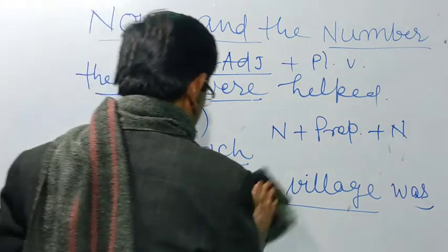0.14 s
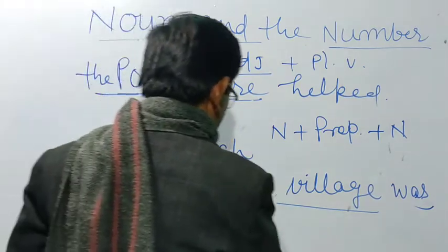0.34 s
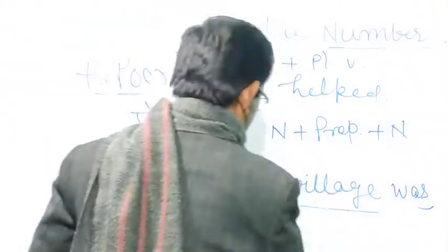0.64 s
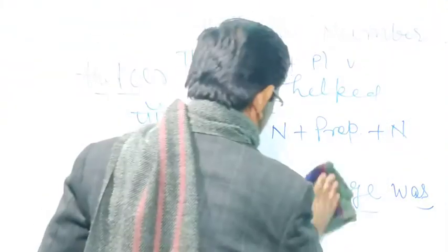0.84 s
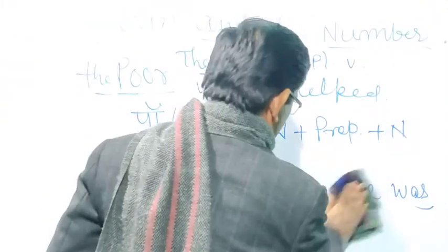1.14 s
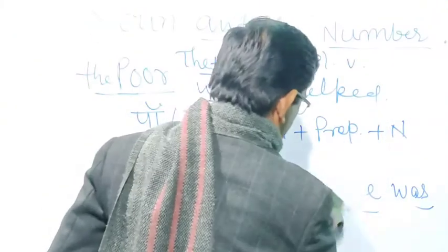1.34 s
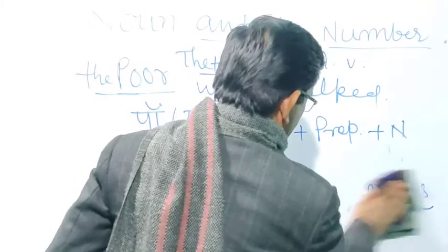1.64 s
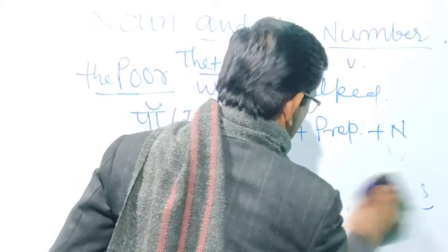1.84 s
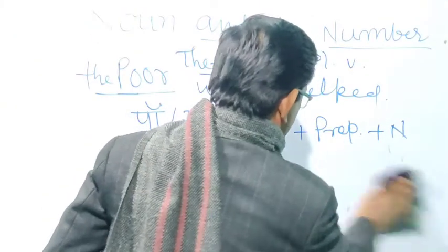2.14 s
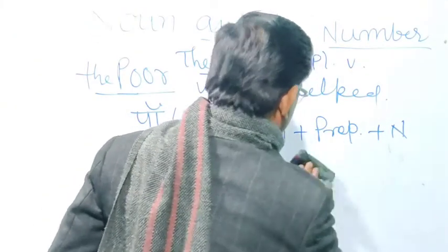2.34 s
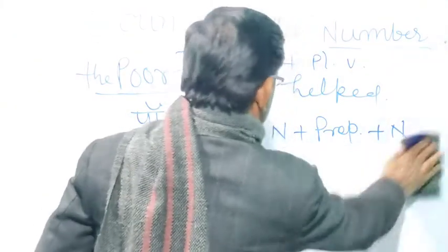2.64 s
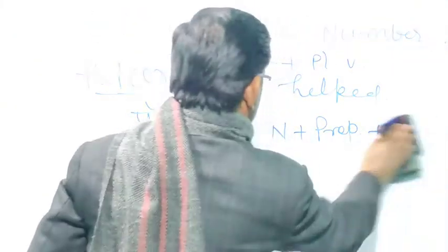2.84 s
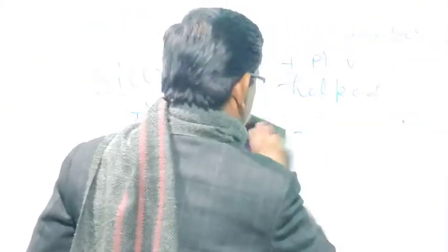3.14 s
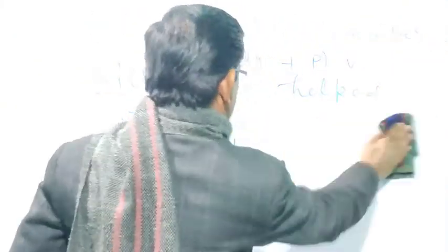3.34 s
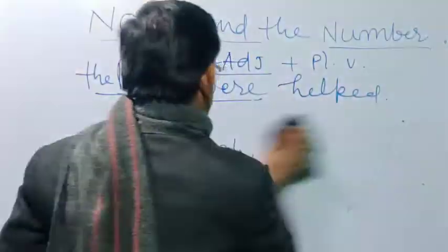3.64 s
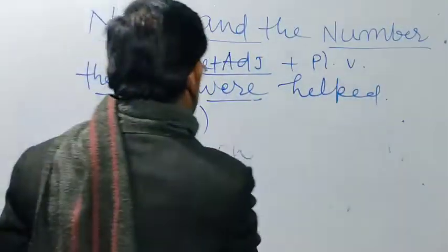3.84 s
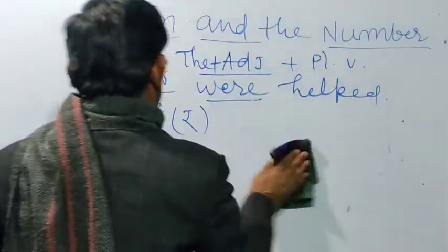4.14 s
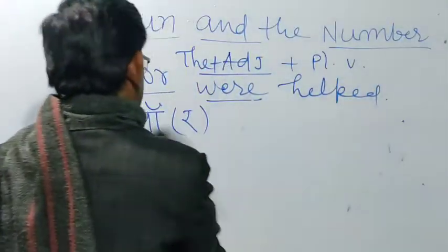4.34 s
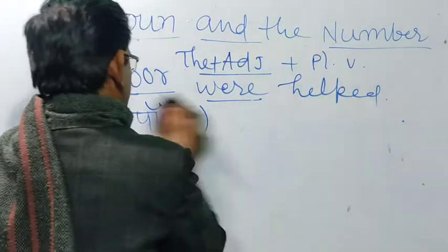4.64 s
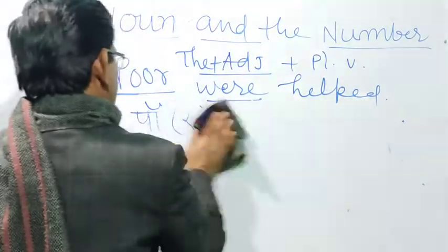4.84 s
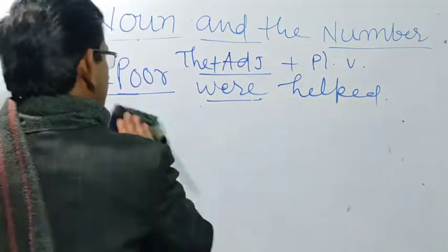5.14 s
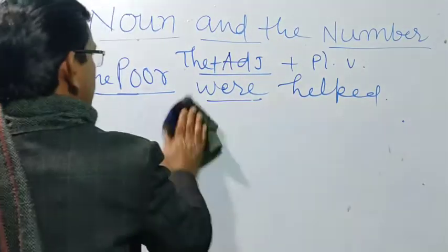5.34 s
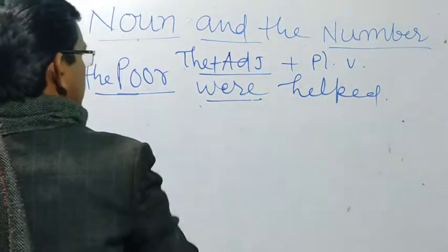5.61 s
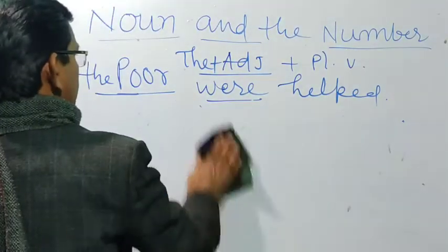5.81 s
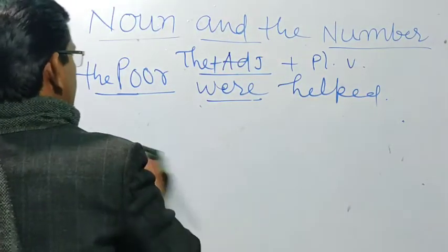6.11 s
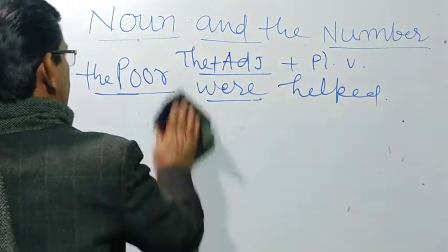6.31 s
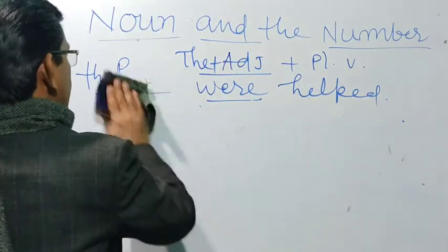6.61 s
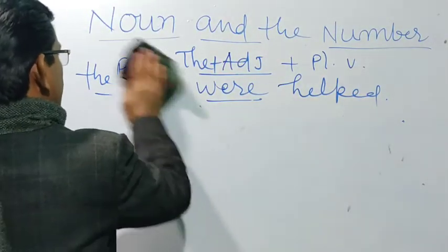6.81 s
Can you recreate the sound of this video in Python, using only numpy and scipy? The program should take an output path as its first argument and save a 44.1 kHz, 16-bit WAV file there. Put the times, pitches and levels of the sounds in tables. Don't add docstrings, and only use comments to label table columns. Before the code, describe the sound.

A hand rubs a folded cloth over a thin wall board, already moving at 0 s and continuing to about 7 s. Strokes last roughly 0.15 to 0.5 s, each swelling in soft hiss and dipping at the turn. Beneath is a hollow, grainy rubbing rumble, with low boom and loose-frame rattle. Light knuckle taps fall at 0.15, 0.3 and 0.6 s. The frame groans at 1.2 s, fading within half a second; a very thin, faint squeak comes near 1.75. Gritty ticks stand out at 2.25, 3.1 and 4.7 s. Dull thuds cluster from 3.3 to 3.9, strongest near 3.4, with firmer rubbing around 3.8; heavy knocks follow at 4.45 and 6.13. From 4.95 to 5.7 a faint far motor tone wavers and rises. Close small microphone, short dull room tail, quiet steady air hiss.

```python
import sys
import numpy as np
from scipy import signal
from scipy.fft import rfft, irfft
from scipy.io import wavfile
from scipy.ndimage import uniform_filter1d

SR = 44100
rng = np.random.default_rng(int(sys.argv[2]) if len(sys.argv) > 2 else 0)


def gain_from_db(level_db):
    decades = np.asarray(level_db, float) / 20
    return 10 ** decades


def digitize_waveform(pressure):
    field = np.atleast_2d(pressure).T
    bounded = np.clip(field, -1, 1)
    quanta = np.round(bounded * 32767).astype(np.int16)
    wavfile.write(sys.argv[1], SR, quanta)


N = 307377


def level(x, db=0.):
    return x * gain_from_db(db) / np.sqrt(np.mean(x ** 2))


def colour(x, points):
    hz, db = np.transpose(points)
    bins = np.maximum(np.arange(N // 2 + 1) * SR / N, 1e-3)
    gain = gain_from_db(np.interp(np.log(bins), np.log(hz), db))
    return irfft(rfft(x) * gain, N)


def ring(x, hz, width):
    return signal.lfilter(*signal.iirpeak(hz, hz / width, SR), x)


def rings(x, table):
    total = np.zeros(N)
    for k, (hz, width, db) in enumerate(table):
        mode = ring(ring(x, hz, width), hz, 2 * width)
        total += (-1) ** k * gain_from_db(db) * mode
    return level(total)


def walk(rate):
    k = int(SR / rate)
    held = np.repeat(rng.standard_normal(N // k + 1), k)
    return level(uniform_filter1d(uniform_filter1d(held, k), k)[:N])


def slips(rate, spread_db):
    happens = rng.random(N) < rate / SR
    return happens * rng.standard_normal(N) * gain_from_db(spread_db * rng.exponential(size=N))


def curves(table):
    s, *columns = np.transpose(table)
    return [np.interp(np.arange(N) / SR, s, c) for c in columns]


def steady(x, seconds, share):
    power = uniform_filter1d(x ** 2, int(seconds * SR))
    return level(x / power ** (share / 2))


def during(start, end):
    t = np.arange(N) / SR
    return uniform_filter1d(1. * ((t > start) & (t < end)), int(0.019 * SR))


def add(out, s, sound):
    i = int(s * SR)
    out[i:i + len(sound)] += sound[:N - i]


def strike(modes, chance, rise_s, stretch=1.0, seconds=.3):
    t = np.arange(int(seconds * SR)) / SR
    y = np.zeros(len(t))
    for (hz, db, t60), c in zip(modes, chance):
        decay = 1000. ** (-t / (t60 * stretch))
        y += gain_from_db(db + 1.5 * c) * np.sin(2 * np.pi * hz * (1 + 0.03 * c) * t) * decay
    y = y * (1 - np.exp(-(t / rise_s) ** 2))
    return -y / np.abs(y).max()


def jolts(events, over_db, seconds):
    out = np.zeros(N)
    for s, db, *_ in events:
        add(out, s, gain_from_db(db + over_db) * np.exp(-np.arange(SR // 3) / SR / seconds))
    return out


# (frequency [Hz], density [dB per Hz])
AIR = [(29, -40), (50, -26), (81, -26), (191, -28.5), (452, -20.5), (766, -22.5), (4720, -29.5),
       (10200, -35.5), (13500, -56), (15200, -30.5)]


def air():
    return level(colour(rng.standard_normal(N), AIR), -64.0)


# (turn [s], hiss at the turn [dB],
# fastest at share of the stroke [0-1], hiss there [dB], fine-fibre sheen over hiss [dB])
STROKES = [(-0.02, -63.5, 1, -62, -0.5), (0.294, -65, 0.1, -63, 2), (0.439, -66.5, 0.2, -62.5, 0.5),
           (0.738, -64, 0.7, -60, 0.5), (0.963, -65, 0.1, -61, 1), (1.098, -63.5, 0.8, -60.5, 3),
           (1.292, -64, .45, -61.5, 1), (1.422, -63, 0.85, -58, 2), (1.676, -64, 0.7, -61, 1),
           (1.866, -64.5, 0.82, -56.5, 1), (2.105, -64.5, 0.6, -60.5, 1.5), (2.434, -67, 0.83, -58.5, -1),
           (2.829, -64, 0.85, -58.5, 0), (3.2, -66, 0.75, -57.5, 0.5), (3.496, -69, 0.82, -59.5, 0),
           (3.936, -67, 0.47, -59.5, 0), (4.225, -66, 1, -60.5, -0.5), (4.575, -64, 0.49, -57, -2),
           (4.894, -69, .7, -60.5, -0.5), (5.198, -64, 0.44, -62, 1), (5.453, -68, 0.66, -58.5, -1),
           (5.927, -65.5, 0.76, -61, 1.5), (6.354, -65.5, 0.9, -60, 0), (6.72, -61.5, 1, -60, 2)]
LAST_TURN_S = 7.05
ARCH_ROUND = 0.81
SHEEN_STALL_PER_DB, MOVING_DB = 0.3, -55
STALL_S, SHEEN_FOLLOW = 0.03, 0.6


def strokes():
    turn_s, turn_db, fastest, top_db, sheen_db = np.transpose(STROKES)
    t, ends = np.arange(N) / SR, np.append(turn_s, LAST_TURN_S)
    k = np.clip(np.searchsorted(turn_s, t) - 1, 0, None)
    done = (t - ends[k]) / np.diff(ends)[k]
    peak = np.clip(fastest, .1, .9)[k]
    rise_or_fall = np.minimum(done / peak, (1 - done) / (1 - peak))
    arch = np.sin(np.pi / 2 * np.clip(rise_or_fall, 0, 1))
    slow_db = np.interp(t, turn_s, turn_db)
    hiss_db = slow_db + (top_db[k] - slow_db) * arch ** ARCH_ROUND
    stall_db = slow_db + SHEEN_STALL_PER_DB * (slow_db - MOVING_DB)
    to_turn_s = np.minimum(t - ends[k], ends[k + 1] - t)
    moving = 1 - np.exp(-(to_turn_s / STALL_S) ** 2)
    full_db = top_db[k] + sheen_db[k] - SHEEN_FOLLOW * (top_db[k] - slow_db) * (1 - arch)
    return hiss_db, stall_db + (full_db - stall_db) * moving


# (frequency [Hz], density [dB per Hz])
HISS = [(880, -8.5), (1500, -3), (4900, -10.5), (8940, -9.5), (13300, -15.5), (15200, -17.5)]


def fibre_hiss():
    hiss_db, sheen_db = strokes()
    fibres = level(colour(rng.standard_normal(N) + 0.1 * level(slips(1500., 2.4)), HISS))
    sheen = signal.sosfiltfilt(signal.butter(2, 10500, "high", fs=SR, output="sos"), fibres)
    hiss = gain_from_db(hiss_db + 5.0) * (fibres - sheen) + gain_from_db(sheen_db + 11.5) * sheen
    return gain_from_db(0.76 * walk(25.)) * hiss


# (hardest [s], length [s], slip rumble [dB], shake of the sheet [dB])
LEANS = [(0.166, 0.31, -58.5, -50.5), (0.376, 0.13, -59.5, -65), (0.576, 0.29, -58.5, -55.5),
         (0.86, 0.19, -57, -59), (1.01, 0.083, -58, -60), (1.29, 0.29, -53.5, -55.5),
         (1.533, 0.3, -55.5, -50), (1.793, 0.18, -57, -56), (2, 0.21, -57, -50.5),
         (2.3, 0.32, -56.5, -54.5), (2.72, 0.34, -59.5, -54.5), (2.905, 0.16, -69, -60),
         (3.084, 0.18, -50, -55), (3.33, 0.32, -54, -56.5), (3.686, 0.13, -56, -57),
         (3.779, 0.25, -47.5, -54), (4.058, 0.3, -54, -55), (4.352, .17, -50.5, -57.5),
         (4.44, 0.26, -52, -53.5), (4.728, 0.25, -52, -57.5), (5.034, 0.28, -55.5, -61),
         (5.15, 0.14, -74, -57), (5.3, 0.19, -61, -62), (5.552, 0.17, -52, -64), (5.688, 0.19, -54, -53.5),
         (5.853, 0.24, -55, -55.5), (6.058, 0.23, -53.5, -57), (6.3, 0.27, -56.5, -59),
         (6.577, 0.45, -65.5, -59), (6.964, 0.23, -55, -54.5)]
BELL_POWER = 1.75


def leans(width):
    t = np.arange(0, N, 64) / SR
    s, length, *db = np.transpose(LEANS)
    bells = np.exp(-np.abs((t - s[:, None]) / (width * length[:, None])) ** BELL_POWER)
    return [np.interp(np.arange(N) / SR, t, np.sqrt(gain_from_db(d) ** 2 @ bells)) for d in db]


# (frequency [Hz], width [Hz], level [dB])
PANEL_RINGS = [(543, 146, 0.5), (755.5, 144, -2.5), (1000, 300, 2.5), (1370, 370, -3), (2000, 1660, -10.5)]
# (time [s], place [-1 edge to 1 middle])
PAD = [(0, .5), (.5, 0.9), (.9, .6), (1.3, .6), (1.75, -0.16), (2.0, 0.32), (2.4, 0.98), (3.1, 0.94),
       (3.4, .3), (3.75, 0.21), (4.05, -.2), (4.38, -0.21), (4.72, -.3), (5.1, -0.38), (5.55, -.5),
       (5.85, -0.29), (6.2, -0.85), (6.97, -0.34)]
LOWEST_DB_PER_PLACE, UPPER_DB_PER_PLACE = 3, 1.1
RUMBLE_REST_DB, REST_PER_DB = -61.5, .5
BRIGHT_PER_DB, FIRM_DB = 0.23, -58.5
JOLT_DB, JOLT_S = -15.5, 0.0079


def pad_rumble():
    (hiss_db, _), (place,) = strokes(), curves(PAD)
    pull = rng.standard_normal(N) + 0.9 * level(slips(900., 0.83))
    lowest = rings(pull, PANEL_RINGS[:1])
    middle = rings(pull, PANEL_RINGS[1:2])
    upper = rings(pull, PANEL_RINGS[2:])
    rest = gain_from_db(RUMBLE_REST_DB + REST_PER_DB * (hiss_db + 62))
    lean = np.hypot(leans(0.26)[0], rest)
    upper = upper * (lean / gain_from_db(FIRM_DB)) ** BRIGHT_PER_DB
    drag = middle - gain_from_db(LOWEST_DB_PER_PLACE * place) * lowest
    drag = drag - gain_from_db(UPPER_DB_PER_PLACE * place + 2.5) * upper
    rumble = lean + jolts(TAPS, JOLT_DB, JOLT_S)
    return rumble * gain_from_db(-5.5 + 0.48 * walk(30.)) * drag


# (frequency [Hz], density [dB per Hz])
FLEX = [(1.8, -43), (3.0, 17.5), (18, 7), (29, -0.5), (60, -43.5), (78, -60), (130, -120)]
# (time [s], slow flexing [dB])
PUSH = [(0.0, -20), (0.06, -34), (1.4, -32.5), (2.17, -39.5), (2.41, -27.5), (2.7, -45.5), (3.43, -28),
        (3.47, -35), (3.8, -30), (4.6, -41), (5.03, -30), (5.47, -46.5), (5.67, -34.5), (6.64, -39.5),
        (6.74, -33), (6.97, -32.5)]
# (frequency [Hz], width [Hz], level [dB])
RATTLE_RINGS = [(97.6, 56, 2), (133, 45.4, 1.5), (181.4, 52.4, 2.5), (266.3, 82, -3), (345, 130, -3.5)]
RATTLE_REST_DB, BOOM_REST_DB, BOOM_OVER_SHAKE_DB = -62.5, -63, 2.5
RATTLE_AFTER_DB, RATTLE_AFTER_S = -15, 0.025
SETTLE_S = .06


def panel():
    (flex_db,), shake = curves(PUSH), leans(0.45)[1]
    flex = steady(colour(rng.standard_normal(N), FLEX), 0.57, 0.56)
    flex = flex * signal.windows.tukey(N, 2 * SETTLE_S * SR / N)
    boom = steady(rings(rng.standard_normal(N), [(53.1, 37.0, 0)]), 0.16, 0.058)
    shaking = rng.standard_normal(N) + 0.48 * level(slips(300., 2.3))
    rattle = steady(rings(shaking, RATTLE_RINGS), 0.082, 0.079)
    boom_gain = np.hypot(gain_from_db(BOOM_OVER_SHAKE_DB) * shake, gain_from_db(BOOM_REST_DB))
    rattle_gain = np.hypot(shake, gain_from_db(RATTLE_REST_DB)) + jolts(THUDS, RATTLE_AFTER_DB, RATTLE_AFTER_S)
    return gain_from_db(flex_db + 0.8) * flex + boom_gain * boom + rattle_gain * rattle


# (time [s], peak [dB], pitch [Hz], ring length [factor])
TAPS = [(0.11, -49, 523, 1.2), (0.144, -36, 996, 0.37), (0.208, -47, 530, 0.96), (0.279, -32.5, 607, 1.35),
        (0.59, -34.5, 957, 0.62), (0.925, -46, 910, 0.88), (1.048, -49, 576, 2.8), (1.205, -48, 475, 2.1),
        (1.449, -37, 546, 0.77), (1.546, -33, 523, 1.1), (1.914, -42.5, 510, 1.6),
        (1.963, -39.5, 580, 0.98), (2.226, -32.5, 540, 2.9), (2.706, -39.5, 705, 0.84),
        (3.098, -38, 502, 2.8), (3.324, -40, 510, 4), (3.363, -39.5, 760, 1.2), (3.414, -49, 454, 0.93),
        (3.44, -43, 457, 1.3), (3.631, -44, 550, 2.2), (3.786, -34, 810, 1.4), (3.798, -36, 597, 1),
        (3.809, -39, 846, 1.4), (3.825, -44, 875, 0.5), (3.889, -48, 600, 1.4), (4.062, -46, 887, 2.5),
        (4.447, -32, 757, 0.66), (5.092, -45, 560, 0.92), (5.693, -41, 654, .8), (6.1257, -37.5, 836, 0.38)]
# (frequency [Hz], level [dB], T60 [s])
TAP_MODES = [(532, -17, 0.22), (810, -0.5, 0.015), (1237, -9.5, 0.029)]


def taps():
    out = np.zeros(N)
    for (s, db, hz, stretch), c in zip(TAPS, rng.standard_normal((len(TAPS), 4))):
        add(out, s, gain_from_db(db - 1.0) * strike([(hz, 0., .04)] + TAP_MODES, c, 0.0016, stretch))
    return out


# (time [s], peak [dB], ring length [factor])
THUDS = [(0.211, -51, 1.1), (0.281, -50, 1.7), (0.391, -47, 1.3), (0.591, -49, 1.2), (1.048, -47.5, 3),
         (1.205, -46, 2.6), (1.451, -46, .6), (1.546, -44, .8), (2.228, -44, 1.2), (2.262, -43, 1.3),
         (3.099, -47.5, 2.5), (3.237, -46, 1.6), (3.325, -44.5, 2.3), (3.363, -40, 1.2), (3.415, -31, 1),
         (3.453, -49, 1), (3.49, -43.5, 1.2), (3.53, -44.5, 1.4), (3.635, -47.5, 1.3), (3.787, -38.5, 1.4),
         (3.81, -38, 1.2), (3.889, -40.5, 2.2), (4.064, -49, 2), (4.448, -32.5, 1.3), (4.519, -48, 1.3),
         (5.105, -42, 1.6), (5.694, -40.5, 0.88), (5.712, -50, 0.99), (6.1266, -33.5, .8)]
# (frequency [Hz], level [dB], T60 [s])
THUD_MODES = [(105.6, 7, 0.23), (162.5, 13.5, 0.079), (190, 11.5, 0.15), (280, -12, 0.051)]


def thuds():
    out = np.zeros(N)
    for (s, db, stretch), c in zip(THUDS, rng.standard_normal((len(THUDS), 4))):
        add(out, s, gain_from_db(db + 4.5) * strike(THUD_MODES, .5 * c, 0.0012, stretch))
    return out


# (frequency [Hz], width [Hz], level [dB])
GROAN_RINGS = [(257, 22, 4.5), (337, 86, -11), (487, 90, -3), (1240, 630, -19)]
GROAN_S, GROAN_DB, GROAN_RISE_S, GROAN_FALL_DB_PER_S = 1.19, -44.5, 0.035, 22


def groan():
    creep = rng.standard_normal(N) + .5 * level(slips(450.0, 1.0))
    since = np.maximum(np.arange(N) / SR - GROAN_S, 0)
    load = np.minimum(since / GROAN_RISE_S, 1) * gain_from_db(GROAN_DB - GROAN_FALL_DB_PER_S * since)
    return during(GROAN_S, GROAN_S + .46) * load * rings(creep, GROAN_RINGS)


# (start [s], end [s])
SQUEAK_SPAN = (1.745, 1.805)


def squeak():
    return during(*SQUEAK_SPAN) * gain_from_db(-65) * rings(rng.standard_normal(N), [(11250, 90, 0)])


# (time [s], peak [dB], pitch [Hz])
GRIT = [(2.0744, -36, 5030), (2.2473, -25, 5220), (2.368, -34, 3000), (2.742, -32, 4000),
        (3.0964, -24, 3970), (4.6755, -27.5, 5650), (4.696, -35, 6000), (4.713, -37, 6000),
        (4.761, -29, 6200), (4.768, -37, 6000), (6.175, -35, 3000)]
GRIT_T60_S, GRIT_MUFFLE_DB = 0.0026, -8.5


def grit():
    out = np.zeros(N)
    for (s, db, hz), c in zip(GRIT, rng.standard_normal((len(GRIT), 2))):
        modes = [(hz, 0., GRIT_T60_S), (1.28 * hz, -2., 0.93 * GRIT_T60_S)]
        add(out, s, gain_from_db(db + GRIT_MUFFLE_DB) * strike(modes, c, 0.0001))
    return out


# (time [s], pitch [Hz], level [dB])
MOTOR = [
    (4.94, 378, -59),
    (5.04, 374.4, -63),
    (5.14, 383, -51),
    (5.24, 385.3, -73),
    (5.31, 392, -54),
    (5.36, 383, -62),
    (5.46, 391, -63),
    (5.6, 418, -62.5),
    (5.72, 400, -67),
]


def motor():
    hz, db = curves(MOTOR)
    phase = 2 * np.pi * np.cumsum(hz * (1 + 0.014 * walk(25.))) / SR
    waver_db = 2.5 * walk(30.)
    tone = np.sin(phase) + gain_from_db(-13.) * np.sin(2 * phase)
    return during(MOTOR[0][0], MOTOR[-1][0]) * gain_from_db(db + waver_db) * tone


ROOM_T60_S, ROOM_DB = 0.23, -20.5


def room(board):
    t = np.arange(int(ROOM_T60_S * SR)) / SR
    tail = rng.standard_normal(len(t)) * 1000. ** (-t / ROOM_T60_S) * (t > .006)
    tail = signal.lfilter([1], [1, -.6], tail)
    return gain_from_db(ROOM_DB) * signal.fftconvolve(board, tail / np.sqrt(np.sum(tail ** 2)))[:N]


def scene():
    rubbing = fibre_hiss() + pad_rumble()
    board = rubbing + taps() + thuds() + groan() + squeak() + grit() + motor()
    return (board + room(board) + panel() + air())[None]


def top_cut(x):
    return signal.sosfilt(signal.butter(12, 15490, fs=SR, output="sos"), x)


def record(dry):
    whine_hz, whine_db = 15429, -83
    whine = gain_from_db(whine_db) * np.sin(2 * np.pi * whine_hz * np.arange(N) / SR)
    return top_cut(dry + whine)


dry = scene()
out = record(dry)
digitize_waveform(out)
```